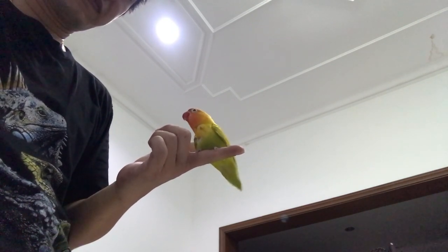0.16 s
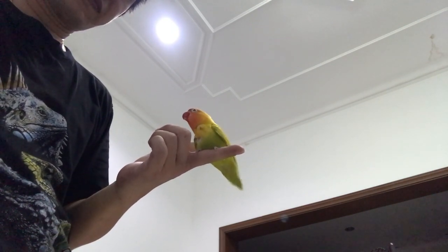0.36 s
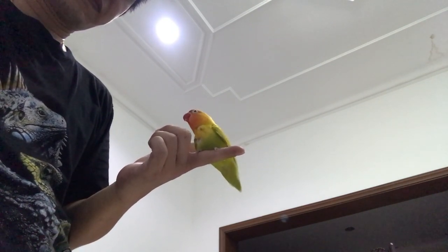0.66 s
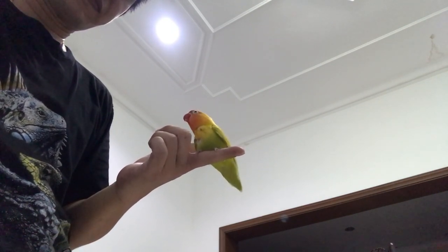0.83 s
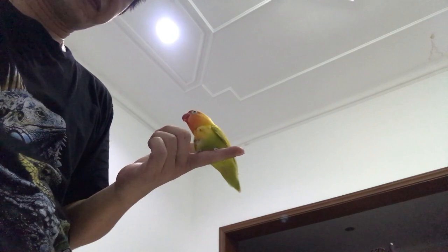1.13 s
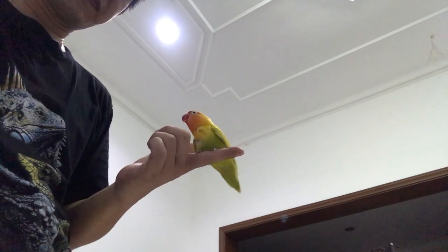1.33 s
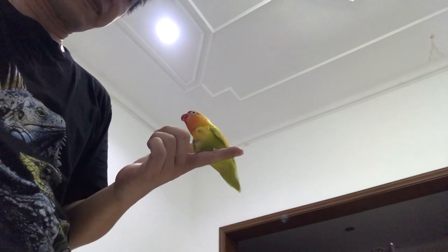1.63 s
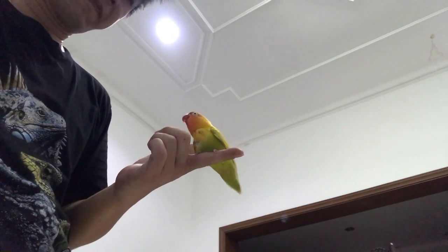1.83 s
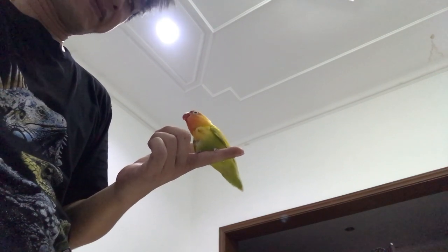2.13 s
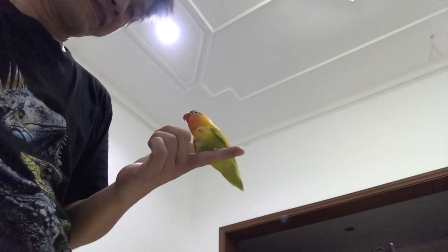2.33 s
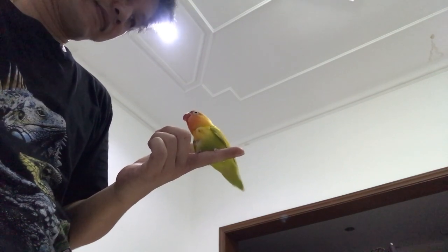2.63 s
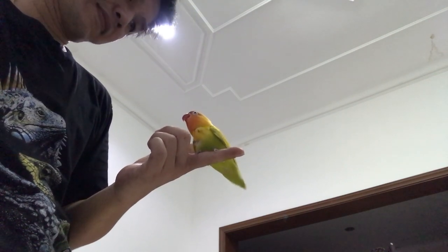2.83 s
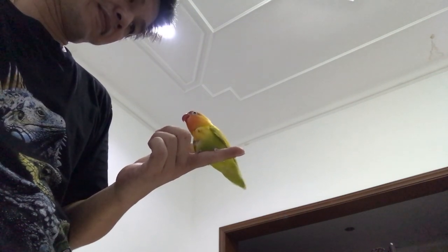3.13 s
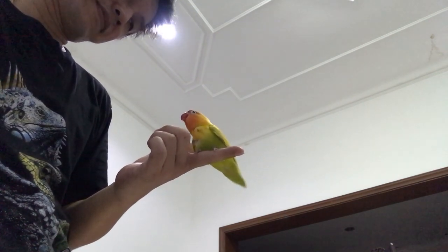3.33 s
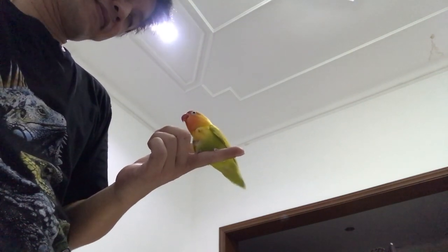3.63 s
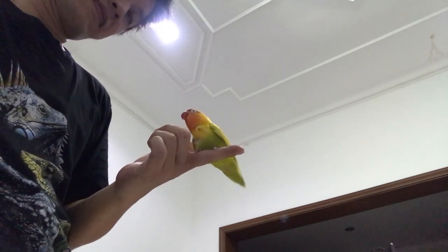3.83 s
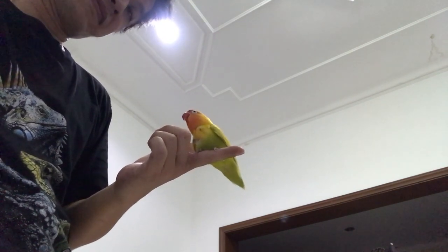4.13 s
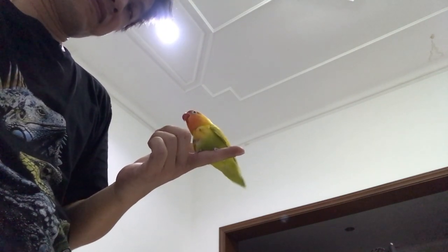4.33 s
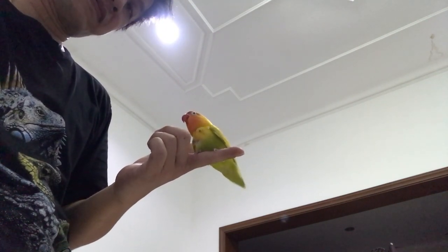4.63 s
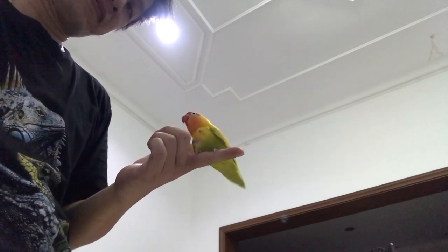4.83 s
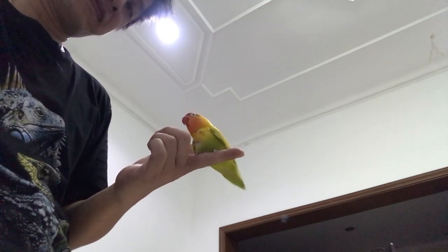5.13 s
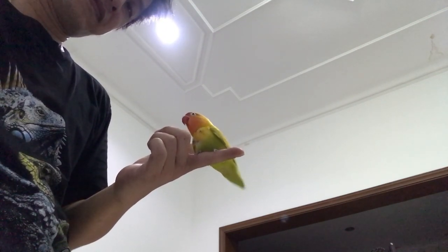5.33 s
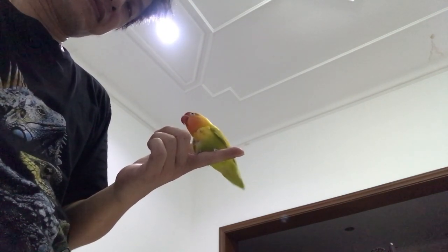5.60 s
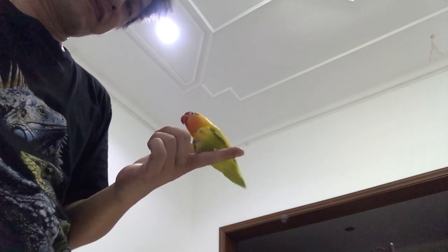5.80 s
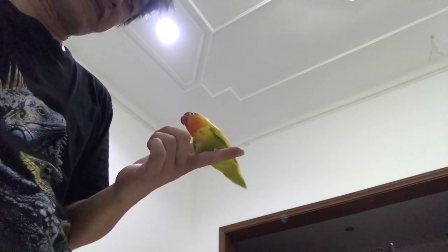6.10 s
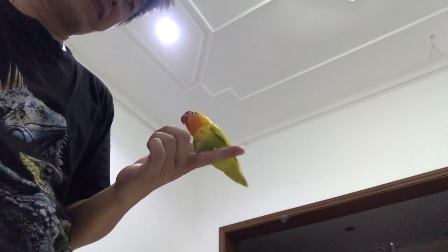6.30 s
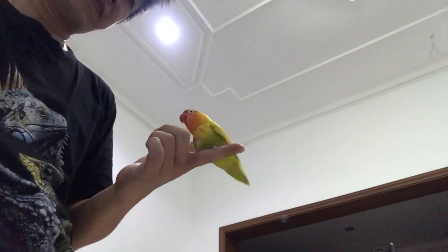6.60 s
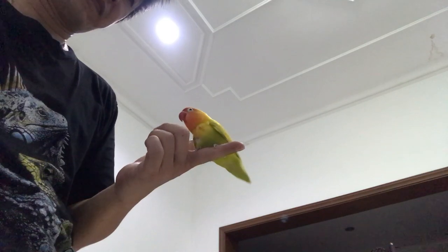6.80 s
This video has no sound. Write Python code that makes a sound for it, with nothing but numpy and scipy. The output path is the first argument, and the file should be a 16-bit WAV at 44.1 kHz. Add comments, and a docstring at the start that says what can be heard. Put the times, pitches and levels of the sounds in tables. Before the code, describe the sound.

A small parrot indoors chatters nonstop in rapid evenly spaced notes, dry ticks turning to churrs, then bright squeaky whoops, with hard-walled ring.

```python
"""A lovebird on a raised hand chatters about twelve notes a second in a bare room, a metre above a phone.
Each note is a fast glide of the syrinx: harmonic sines coloured by throat and beak, with breath noise.
First come short ticks, then dips and falling churrs, then longer rising squeals, slides and whoops.
Hard walls ring between the notes as decaying noise echoes, over filtered hiss and a quiet, wavering hum."""
import sys
import numpy as np
from scipy import signal
from scipy.fft import rfft, irfft
from scipy.io import wavfile
from scipy.ndimage import uniform_filter1d

SR = 44100
rng = np.random.default_rng(int(sys.argv[2]) if len(sys.argv) > 2 else 0)


def persist_wave(psi):
    """Save psi, clipped to +-1, as 16-bit WAV."""
    counts = np.round(np.clip(psi, -1, 1) * 32767).astype(np.int16)
    wavfile.write(sys.argv[1], SR, np.atleast_2d(counts).T)


N = 306936


def undb(db):
    """Decibels to an amplitude factor."""
    return 10 ** (np.asarray(db) / 20)


def wobble(size, rate):
    """Smooth chance, turning about rate times a second; spread 1."""
    k = int(SR / rate)
    x = uniform_filter1d(rng.standard_normal(size), k)
    x = uniform_filter1d(x, k)
    return x / x.std()


def coloured(x, points):
    """Shape the spectrum of x by (Hz, dB) points, joined along log frequency."""
    hz, db = np.transpose(points)
    f = np.arange(len(x) // 2 + 1) * SR / len(x) + 1
    gain = undb(np.interp(np.log(f), np.log(hz), db))
    return irfft(rfft(x) * gain, len(x))


# spectral tilt of the room air: freq_hz, relative_level_db
AIR_COLOUR = [(30, -21), (50, 3.5), (65, -5), (136, -5), (200, -10.5), (400, -7), (490, -11.5), (800, -4.5),
              (1300, -4.5), (2200, -10), (5000, -4.5), (16000, -29)]
AIR_DB = -43.5  # middle level of the swelling hiss
# hum partials: freq_hz, level_db (each wavers around it)
HUM_PARTIALS = [(64.6, -63), (129.2, -66.5)]


def room_air():
    """Steady hiss and rumble that swell a little, with a hum wavering in level and phase."""
    hiss = coloured(rng.standard_normal(N), AIR_COLOUR) * undb(.6 * wobble(N, 4))
    t = np.arange(N) / SR
    hum = np.zeros(N)
    for hz, db in HUM_PARTIALS:
        level = undb(db + 3.9 * wobble(N, 6.0)) * np.sqrt(2)
        hum += level * np.sin(2 * np.pi * hz * t + 0.61 * wobble(N, 7.7))
    return undb(AIR_DB) * hiss / hiss.std() + hum


# what the walls send back: freq_hz, gain_db
WALL_COLOUR = [(1500, -13), (2300, -2.5), (3200, -1), (4300, 4), (5200, -1.5), (6300, -0.5), (9000, 0.5),
               (15000, -6)]


def room(x, wet_db, t60_low, t60_high, build_s, wall_s, wall_db, near_s, near_db):
    """Hand and body scatter at once, one wall answers, then echoes thicken and lose their treble sooner."""
    t = np.arange(SR) / SR
    clumps_db = 2 * wobble(SR, 500) * np.exp(-t / .1)  # uneven at first, evening out
    echoes = rng.standard_normal(SR) * undb(clumps_db)
    low = signal.sosfilt(signal.butter(2, 7000, fs=SR, output="sos"), echoes)
    tail = low * undb(-60 * t / t60_low) + (echoes - low) * undb(-60 * t / t60_high)
    tail *= 1 - np.exp(-t / build_s)
    tail /= np.sqrt(np.sum(tail ** 2))
    near = rng.standard_normal(SR) * t * np.exp(-t / near_s)
    tail += undb(near_db) * near / np.sqrt(np.sum(near ** 2))
    tail[int(wall_s * SR)] += undb(wall_db)
    return signal.fftconvolve(x, undb(wet_db) * coloured(tail, WALL_COLOUR))


# bands that cancel on the way to the phone: centre_hz, width_hz, depth_share (capped at .85)
HOLLOWS = [(2672, 160, 1), (13060, 3560, 1)]


def hollow(x):
    """Subtract resonant bands from the voice where paths to the phone cancel."""
    for notch_hz, width_hz, depth in HOLLOWS:
        band = signal.lfilter(*signal.iirpeak(notch_hz, notch_hz / width_hz, fs=SR), x)
        x = x - np.minimum(depth, .85) * band
    return x


# where the throat and beak gains apply: freq_hz
THROAT_HZ = [2000, 3200, 4600, 6200, 8200, 10500, 13000, 14600]
WARBLE_HZ, WARBLE_Q = 226, 4.02  # resonance of the pitch itself after a leap


def syrinx(notes, throat_db, slope_db, effort, jitter, hiss_db, crack_db, low_db=0, crowd=1, throb_db=1,
           overshoot=0, dip_db=0, rich_db=0):
    """Harmonic glides; louder blowing sharpens overtones, membranes throb and waver, leaps crack into noise."""
    hz, db = np.full(N, 3000.), np.full(N, -90.)
    edge, leap = np.zeros(N), np.zeros(N)
    spring = signal.iirpeak(WARBLE_HZ, WARBLE_Q, fs=SR)
    t = np.arange(N) / SR
    for s, ms, pitch, level in notes:
        length = ms / 1000
        on = slice(int(s * SR) - 12, int((s + length) * SR) + 130)
        # crowd above 1 packs the points towards the note's start
        u = np.clip((t[on] - s) / length, 0, 1) ** (1 / crowd)
        step, part = np.divmod(u * (len(pitch) - 1), 1)
        # the syrinx dwells on a pitch and leaps to the next
        eased = (part + part ** 2 * (3 - 2 * part)) / 2
        hz[on] = np.interp(step + eased, np.arange(len(pitch)), pitch)
        # the tensed membranes overshoot each leap and warble before they settle
        hz[on] += overshoot * signal.lfilter(*spring, hz[on] - pitch[0])
        leap[on] = abs(np.gradient(np.log(hz[on]))) * SR / 200
        db[on] = 20 * np.log10(np.interp(u, np.linspace(0, 1, len(level)), undb(level)))
        # the note snaps open and dies away within a few milliseconds
        opening = np.clip((t[on] - t[on][0]) / .0003, 0, 1)
        edge[on] = opening * np.exp(-np.clip(t[on] - s - length, 0, 1) / .0008)

    on = edge > 0
    leap = np.clip(uniform_filter1d(leap, 30), 0, 1)[on]
    hz = uniform_filter1d(hz, 9)[on]
    hz = hz * (1 + jitter * (1 + 2 * leap) * wobble(N, 1200)[on])
    db = (db + throb_db * wobble(N, 1100))[on] + dip_db * (leap - leap.mean())
    phase = 2 * np.pi * np.cumsum(hz) / SR

    k = np.arange(1, 9)[:, None]  # harmonic numbers
    # the lowest pitches are purer (low_db); pitches held near 2.9 kHz are reedy (rich_db)
    slope = slope_db + effort * (db + 15) + low_db * np.clip((2700 - hz) / 450, 0, 1)
    slope += rich_db * (1 - leap) * np.exp(-((hz - 2870) / 260) ** 2)
    throat = np.interp(np.log(k * hz), np.log(THROAT_HZ), throat_db)
    gain = undb(slope * np.log2(k) + throat) * (k * hz < .42 * SR)
    # each overtone shimmers alone
    gain *= undb(1.5 * np.array([wobble(on.sum(), 600) for _ in k]))
    # the blend is levelled, so overtones change the colour and not the loudness
    voice = np.sum(gain * np.sin(k * phase + k ** 2), axis=0) / np.sqrt(np.sum(gain ** 2, axis=0) / 2)

    breath = coloured(rng.standard_normal(on.sum()), [(1500, -40), *zip(THROAT_HZ, throat_db)])
    breath_gain = undb(hiss_db) + undb(crack_db) * leap
    out = np.zeros(N)
    out[on] = (voice + breath_gain * breath / breath.std()) * undb(db) * edge[on]
    return hollow(out)


FADE_MS, FADE_DB = 3.6, -6  # extra fade at the end of a glide


def glide(s, ms, pitch, level):
    """One note from (ms, Hz) and (ms, dB) corners, read twice a millisecond, fading at its end."""
    m = np.linspace(0, ms, int(2 * ms) + 2)
    fade = FADE_DB * np.clip(1 - (ms - m) / FADE_MS, 0, 1)
    return s, ms, np.interp(m, *np.transpose(pitch)), np.interp(m, *np.transpose(level)) + fade


# ticks: start_s, length_ms, end_pitch_hz, base_level_db
TICKS = [(0.0144, 4.1, 4540, -13.5), (0.0786, 4, 4550, -12), (0.1439, 4.04, 4637, -14),
         (0.2092, 3.86, 4370, -11.5), (0.2729, 4.0, 4626, -13), (0.3368, 3.55, 4630, -13),
         (0.4014, 3.6, 4654, -11), (0.4667, 3.16, 3710, -13), (0.5326, 4.13, 3980, -13.5),
         (.6002, 4.55, 4070, -13), (.6679, 3.4, 3435, -14), (0.7383, 4.26, 3400, -12.5),
         (0.8069, 3.5, 3390, -13), (0.8759, 3.7, 3316, -13.5), (2.3833, 3.9, 2900, -8.5)]
# level contour spread evenly over the tick: offset_db
TICK_SHAPE_DB = [-2.5, -0.5, -4.5, -12]
# throat and beak on ticks, one per THROAT_HZ: gain_db
TICK_THROAT_DB = [-16, -3, 1.5, 3, -15.5, -16, -8.5, -11]
TICK_START_HZ, TICK_SECOND_HZ = 2735, 3184


def ticks():
    """Flicks of the syrinx towards an end pitch, loudest early on."""
    notes = []
    for s, ms, end_hz, db in TICKS:
        notes.append((s, ms, [TICK_START_HZ, TICK_SECOND_HZ, end_hz, end_hz], db + np.array(TICK_SHAPE_DB)))
    return syrinx(notes, TICK_THROAT_DB, slope_db=2.0, effort=0.15, jitter=0.0265, hiss_db=-12, crack_db=-9)


CLICK_START_HZ = 2853  # or the click's crest, if that is lower
CLICK_CREST, CLICK_DROOP = .4, .93  # crest time as a share of the click, last pitch as a share of the crest
FALL_MS, SETTLE_MS, SHELF = 2.2, 4.6, 1.1  # the fall lands at SHELF times the trough, then settles
GAP_MS, GAP_DB = 2.6, -8  # the voice breaks on the way down, at most this deep
UPSWING_HZ, UPSWING_MS, UPSWING_DB, UPSWING_LEAD_MS = 3300, 2.4, 4.5, 1.6


def dip(s, ms, click, click_hz, click_db, low_hz, up, end_hz, db):
    """A click, a fall into a low trough, then a swing upwards if the note lasts that long."""
    crest, turn = CLICK_CREST * click, up - UPSWING_LEAD_MS
    settled = min(click + SETTLE_MS, turn - .2)
    pitch = [(0, min(CLICK_START_HZ, click_hz)), (crest, click_hz), (click, CLICK_DROOP * click_hz),
             (click + FALL_MS, SHELF * low_hz), (settled, low_hz), (turn, low_hz),
             (up, UPSWING_HZ), (up + UPSWING_MS, end_hz)]
    # the shortest and longest clicks glide on with less of a break
    gap_db = GAP_DB * np.clip(min(click, 8 - click) / 2, 0, 1)
    level = [(0, click_db), (min(crest, 1), click_db), (click, click_db), (click + GAP_MS, db + gap_db),
             (settled, db), (turn, db), (up, db + UPSWING_DB)]
    return glide(s, ms, pitch, level)


# dips: start_s, length_ms, click_ms, click_hz, click_db, trough_hz, upswing_at_ms, end_pitch_hz, trough_db
DIPS = [(.9461, 7.7, .3, 2560, -22, 2250, 5, 4400, -19), (1.008, 16, .4, 2800, -20, 2280, 11, 4870, -18.5),
        (1.0737, 18.6, 2.3, 3150, -12, 2300, 11.5, 5150, -16.5),
        (1.1393, 19.5, 3, 3650, -13, 2330, 12.5, 5050, -20),
        (1.2086, 11.7, .4, 2480, -26, 2330, 7.8, 4650, -21),
        (1.2701, 18.5, 2.4, 3650, -14, 2300, 12.6, 4680, -20.5),
        (1.338, 17.5, 2.2, 3400, -14, 2240, 12.2, 4650, -21),
        (1.406, 15, 2.2, 3100, -15, 2210, 12, 4450, -21),
        (1.4723, 15.2, 1.6, 3430, -15, 2230, 12, 4680, -22),
        (1.539, 15.2, 2.6, 3500, -12, 2260, 12, 4680, -21),
        (1.6046, 16, 2.6, 3300, -14, 2250, 12, 4550, -22),
        (1.672, 15, 2.8, 3000, -13, 2230, 12.2, 4680, -22),
        (1.7411, 16, 3.8, 3350, -14, 2200, 13, 4680, -22),
        (1.8095, 17, 3.8, 3750, -13, 2200, 14, 4520, -20),
        (1.879, 15.5, 3.8, 3550, -12, 2180, 14, 3900, -21),
        (1.9494, 15, 4.2, 3600, -13, 2180, 14, 3900, -19),
        (2.0189, 15.2, 4.2, 3550, -13, 2150, 14.2, 3700, -23),
        (2.0889, 15.5, 4.8, 4000, -14, 2120, 15, 3700, -24),
        (2.1612, 16.7, 5.8, 4050, -14, 2050, 16, 3500, -23),
        (2.2332, 17.2, 7.5, 4650, -15, 1920, 25, 3500, -21),
        (2.3071, 16, 7.2, 3750, -15, 1880, 25, 3500, -19),
        (2.391, 10.5, 3.2, 3400, -14, 2020, 25, 3500, -22)]
# throat and beak on dips, one per THROAT_HZ: gain_db
DIP_THROAT_DB = [-16.5, -2, -8.5, 2.5, -15.5, -11, -8, -11]


def dips():
    """The syrinx slackens after each click; its low pitches sound purer."""
    return syrinx([dip(*r) for r in DIPS], DIP_THROAT_DB, slope_db=1.0, effort=0.27, jitter=.008,
                  low_db=-4.5, dip_db=0.5, hiss_db=-18, crack_db=-10)


# churrs: start_s, length_ms, first_pitch_hz, held_pitch_hz, peak_db, later_level_db
CHURRS = [(2.4688, 13.4, 2580, 2120, -13.5, -19), (2.5473, 12.6, 2447, 1991, -13, -21),
          (2.6256, 15.3, 2903, 2086, -11.5, -25), (2.7055, 15.4, 2544, 2052, -14.5, -18.5),
          (2.785, 16.5, 2407, 2056, -13.5, -23), (2.8658, 15, 2500, 2037, -13, -21.5),
          (2.9443, 16, 2547, 2030, -13.5, -20), (3.0261, 15.6, 2404, 2050, -15, -21.5),
          (3.1086, 14.2, 2417, 2010, -14.5, -17.5), (3.1899, 15.1, 2566, 2056, -13, -23),
          (3.2705, 15.1, 2500, 1977, -14, -17), (3.3529, 15, 2523, 2000, -13.5, -20.5),
          (3.4357, 14, 2557, 2000, -12.5, -20.5), (3.5169, 15.2, 2702, 2000, -13.5, -21),
          (3.6028, 15.4, 2542, 1982, -13, -20), (3.6863, 17.9, 2470, 2027, -14, -20),
          (3.7718, 17.5, 2780, 2045, -11.5, -22), (3.8588, 15.7, 2694, 2005, -12.5, -20),
          (3.943, 17.0, 2713, 2000, -13.5, -20), (4.0308, 15, 2460, 2045, -13.5, -20)]
# throat and beak on churrs, one per THROAT_HZ: gain_db
CHURR_THROAT_DB = [-7, -7, -2.5, 3, -13.5, -9, -8, -7]
CHURR_ONSET, CHURR_LANDING, CHURR_LIFT = 1.05, 1.03, 1.02  # shares of the first, held and held pitch
CHURR_START_DB, CHURR_SAG_DB, CHURR_END_DB = -21, -3.5, -25.5  # the sag is relative to the peak


def churrs():
    """Quick drops onto a held pitch, crowded towards each note's start."""
    notes = []
    for s, ms, first_hz, hz, db, later_db in CHURRS:
        pitch = [CHURR_ONSET * first_hz, first_hz, CHURR_LANDING * hz, hz, CHURR_LIFT * hz]
        level = [CHURR_START_DB, db, db + CHURR_SAG_DB, later_db, CHURR_END_DB]
        notes.append((s, ms, pitch, level))
    return syrinx(notes, CHURR_THROAT_DB, slope_db=0.5, effort=0.071, jitter=0.0046,
                  hiss_db=-20, crack_db=-2, crowd=2)


SQUEAL_LEAD_HZ, SQUEAL_LEAD_DB = 2230, -22
BREAK_MS, BREAK_DB, LEAP_DB = 1.6, -21, -13  # the pitch breaks just before the leap
SQUEAL_SAG, SAG_MS, LULL_MS, SWELL_MS = .94, 2, 4, 7  # pitch share, and times after the leap
# the crest that opens a squeal: from_crest_ms, pitch_hz, level_db
SQUEAL_CREST = [(-4.5, 2260, -24), (-2.8, 2450, -25), (-1.2, 3300, -17), (0, 3950, -13), (1, 3900, -16),
                (1.9, 3750, -14)]


def squeal(s, lead, tail, break_hz, leap, hz, lull_db, swell_db):
    """A low lead-in, a crest, a break, then a leap onto a held pitch that lulls and swells."""
    rows = np.array([(-lead - 1, SQUEAL_LEAD_HZ, SQUEAL_LEAD_DB), *SQUEAL_CREST,
                     (leap - BREAK_MS, break_hz, BREAK_DB), (leap, hz, LEAP_DB),
                     (leap + SAG_MS, SQUEAL_SAG * hz, (LEAP_DB + lull_db) / 2),
                     (leap + LULL_MS, .98 * hz, lull_db), (leap + SWELL_MS, hz, swell_db),
                     (tail, hz, swell_db - 1)])
    rows[:, 0] += lead
    return glide(s - lead / 1000, lead + tail, rows[:, :2], rows[:, ::2])


# squeals: crest_s, lead_in_ms, tail_ms, break_hz, leap_at_ms, held_pitch_hz, lull_db, swell_db
SQUEALS = [(4.1091, 6.4, 22, 3000, 5.5, 4780, -15, -12), (4.2015, 6.5, 20, 3450, 4.5, 4790, -14, -13),
           (4.2951, 4.5, 22, 3300, 5.8, 4740, -16, -13), (4.3907, 6.8, 19, 3650, 5.8, 4530, -13, -13),
           (4.4863, 9.3, 21, 2950, 4.6, 4370, -18, -11), (4.582, 8.2, 19, 3000, 4.6, 4220, -21, -12),
           (4.6778, 8.2, 21, 3700, 5.5, 4250, -22, -12), (4.7745, 9.6, 19.4, 2950, 4.6, 4200, -19, -14),
           (4.8718, 8.2, 22, 3400, 4.6, 4250, -21, -17), (6.8614, 7.1, 22, 2950, 4.6, 4560, -15, -14),
           (6.9575, 7.3, 22, 2950, 4.6, 4560, -15, -14)]


def squeals():
    """Notes whose pitch breaks and leaps to a tenser membrane."""
    return [squeal(*r) for r in SQUEALS]


# slides: start_s, then corners of time_ms, pitch_hz, level_db
SLIDES = [(4.9512, [(0, 2060, -24), (4, 2450, -23), (10, 2750, -24), (14, 2870, -18), (21, 2850, -14),
          (25.5, 2680, -14), (28, 5000, -15), (32, 4830, -21), (36, 5050, -18), (40, 5050, -21)]),
          (5.0479, [(0, 2050, -28), (3, 2350, -25), (6.5, 3100, -19), (12, 2990, -17), (24, 2980, -16),
          (30, 2720, -12), (32.5, 4950, -13), (36, 4950, -15), (40, 5030, -19), (43.7, 4970, -21)]),
          (5.1502, [(0, 1980, -29), (5.5, 2100, -26), (9, 3250, -21), (12, 3490, -17), (23, 3620, -15),
          (33, 3900, -14), (35, 3400, -16), (36.5, 4300, -18), (39, 3500, -15), (41, 4500, -17),
          (44, 4200, -21), (51, 4300, -18)])]


def slides():
    """Long climbs over plateaus of pitch."""
    notes = []
    for s, corners in SLIDES:
        rows = np.array(corners)
        notes.append(glide(s, rows[-1, 0], rows[:, :2], rows[:, ::2]))
    return notes


WHOOP_LEAD_DB, WHOOP_KNEE_MS = -8, -17.5  # level against the whoop's own, time from the spike
WHOOP_SCOOP = .96  # the lead-in scoops up from this share of its pitch
# contour of a whoop: from_spike_ms, pitch_over_shelf_ratio, offset_db
WHOOP_SHAPE = [(-15, .59, -6), (-13, .72, -5), (-10.7, .95, 1.5), (-9, .93, -5), (-7, .97, -5),
               (-5, 1.03, 3.5), (-3, 1.01, -3), (-1.5, 1.09, 2), (0, 1.45, 1), (1.5, 1.3, 1),
               (3.3, 1.05, 0), (5.8, 1.22, 1), (8.5, 1.08, -1), (11, 1.17, -2), (17, 1.08, -6)]


def whoop(s, lead, tail, low_hz, hz, db):
    """A low lead-in, a climb to a shelf, a spike and a dying warble."""
    rows = np.array([(-lead, WHOOP_SCOOP * low_hz / hz, WHOOP_LEAD_DB - 2.5),
                     (WHOOP_KNEE_MS, low_hz / hz, WHOOP_LEAD_DB), *WHOOP_SHAPE])
    rows = rows * [1, hz, 1] + [lead, 0, db]
    return glide(s - lead / 1000, lead + tail, rows[:, :2], rows[:, ::2])


# whoops: spike_s, lead_in_ms, tail_ms, lead_in_hz, shelf_hz, base_level_db
WHOOPS = [(5.2862, 27.5, 12.5, 2110, 4250, -16), (5.3805, 22.4, 15, 2170, 4300, -16),
          (5.477, 20.5, 10.8, 2290, 4330, -15.5), (5.5733, 22.2, 12, 2150, 4290, -16),
          (5.6697, 22.5, 11.5, 2170, 4370, -15.5), (5.7657, 21.5, 14.8, 2220, 4270, -16),
          (5.8665, 22.3, 11.2, 2200, 4360, -15), (5.9652, 22, 11, 2170, 4250, -16),
          (6.065, 22.3, 11.5, 2210, 4320, -16), (6.1658, 24.3, 12, 2190, 4230, -16),
          (6.2652, 22.3, 15.9, 2190, 4320, -15), (6.3652, 24.3, 13, 2120, 4230, -15.5),
          (6.4674, 22, 13, 2360, 4300, -15.5), (6.5687, 23.3, 13, 2220, 4330, -15),
          (6.6714, 23.5, 12, 2230, 4270, -16.5), (6.7701, 23, 15.5, 2220, 4230, -16)]


def whoops():
    """Scooping notes that spike above their shelf pitch."""
    return [whoop(*r) for r in WHOOPS]


# throat and beak on squeals, slides and whoops, one per THROAT_HZ: gain_db
LONG_THROAT_DB = [-15.5, 8, -4, 2, -8.5, -10, 3, -13]


def long_calls():
    """Squeals, slides and whoops from one syrinx setting, with springy membranes and reedy plateaus."""
    return syrinx(squeals() + slides() + whoops(), LONG_THROAT_DB, slope_db=-4.5, effort=0.31, jitter=0.01226,
                  throb_db=0.8, overshoot=0.136, dip_db=3.0, rich_db=7.0, low_db=-8, hiss_db=-28, crack_db=-14)


def scene():
    """The bird, its ring off the walls, and the air of the room."""
    bird = ticks() + dips() + churrs() + long_calls()
    # the bird was already ticking, so the walls ring from the first moment
    before = int(.39 * SR)
    ring = room(np.r_[bird[:before], bird], wet_db=-9, t60_low=1.0, t60_high=0.82, build_s=0.0085,
                wall_s=.0155, wall_db=-17, near_s=0.0012, near_db=-6)
    return (bird + ring[before:before + N] + room_air())[None]


TOP_HZ = 15600


def record(dry):
    """The phone cuts the top with a steep low-pass."""
    return signal.sosfilt(signal.ellip(8, .2, 70, TOP_HZ, fs=SR, output="sos"), dry)


dry = scene()
out = record(dry)
persist_wave(out)
```